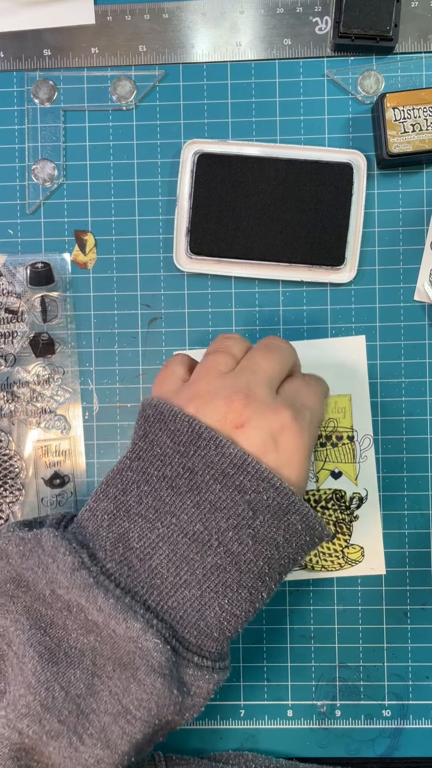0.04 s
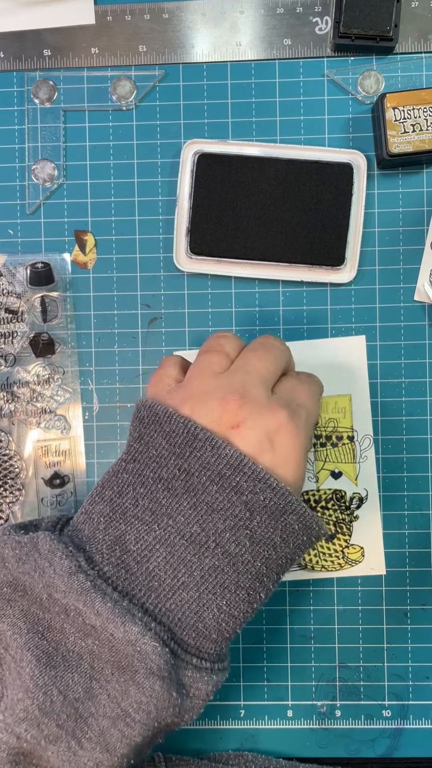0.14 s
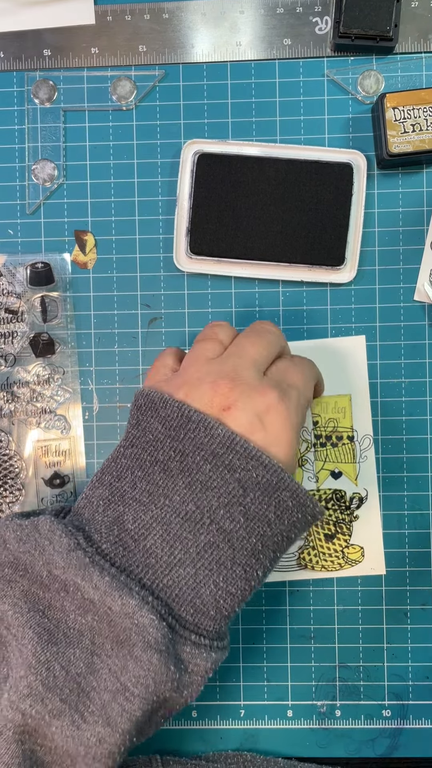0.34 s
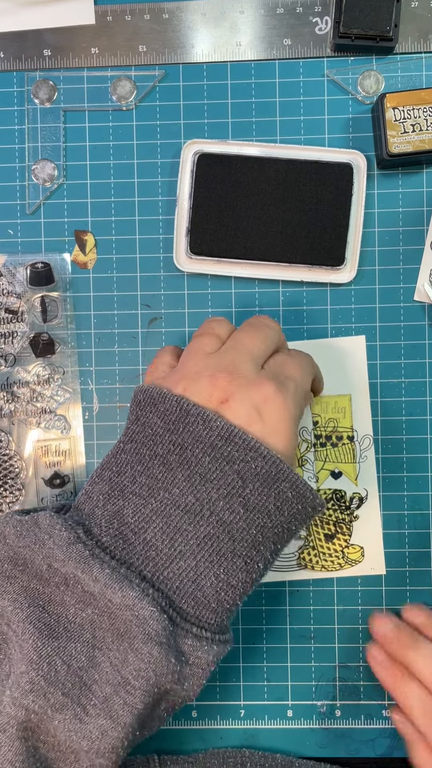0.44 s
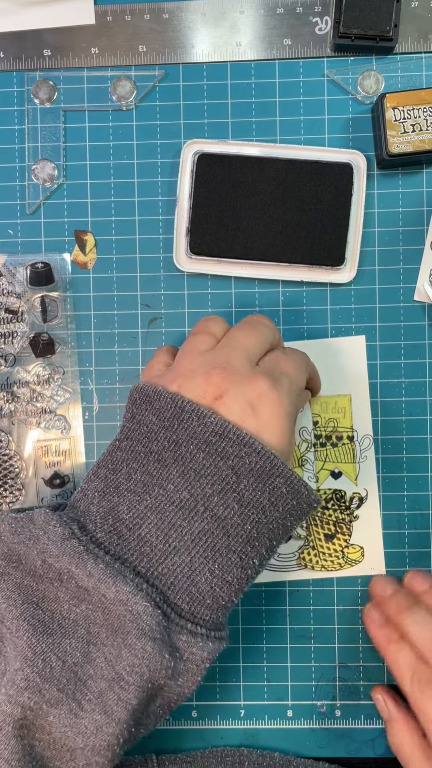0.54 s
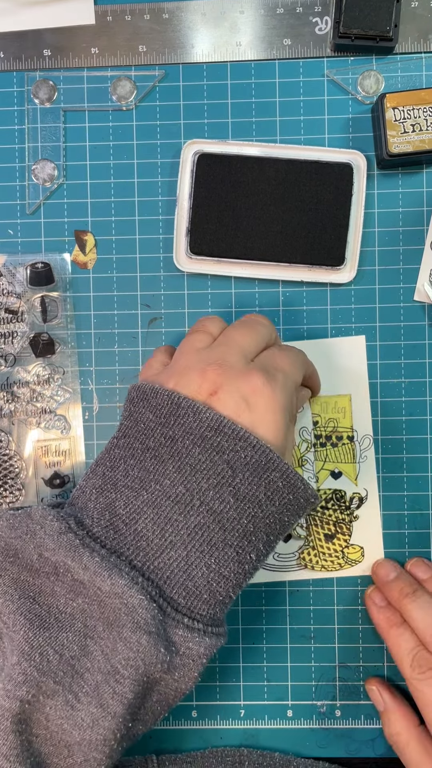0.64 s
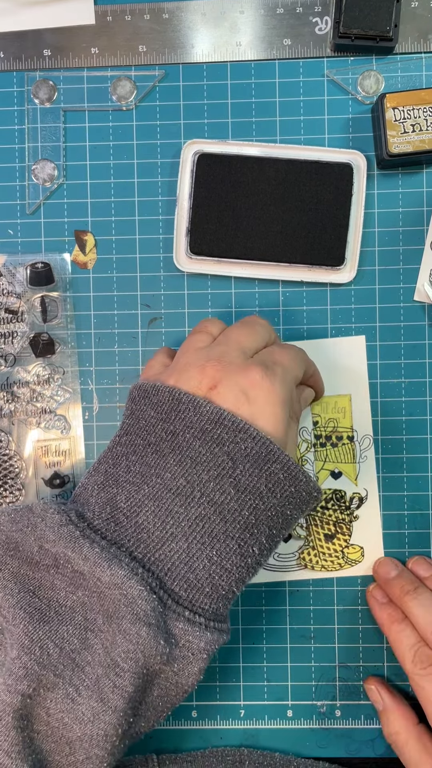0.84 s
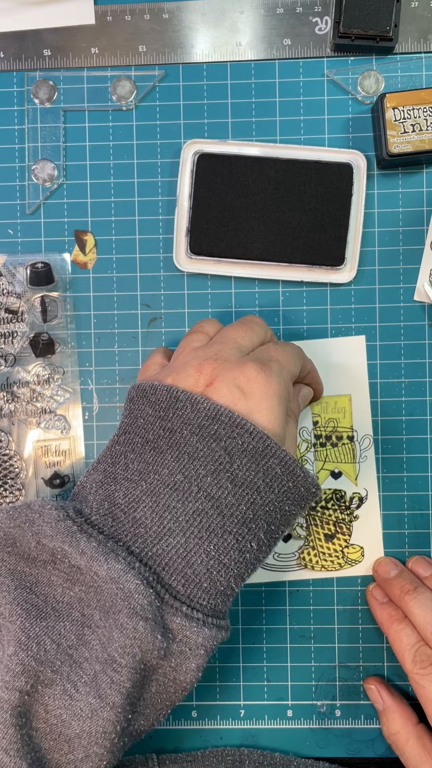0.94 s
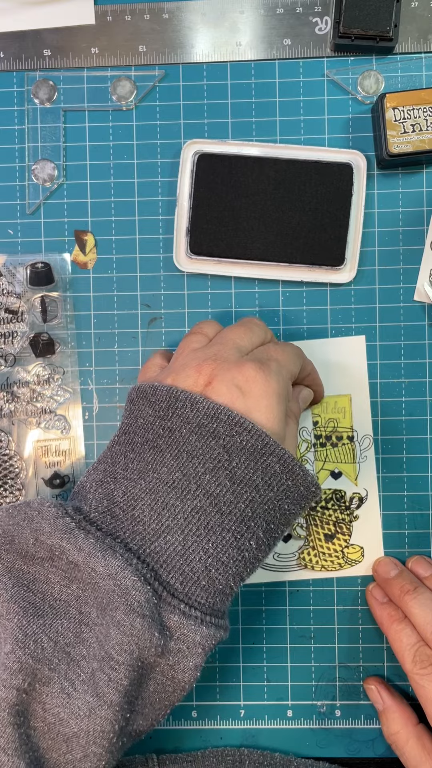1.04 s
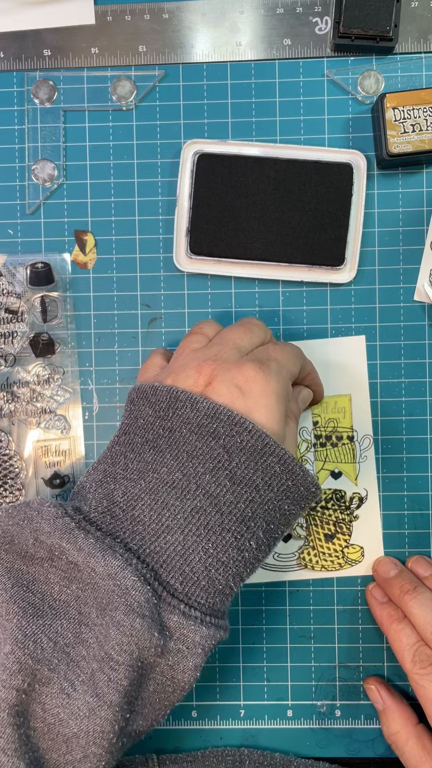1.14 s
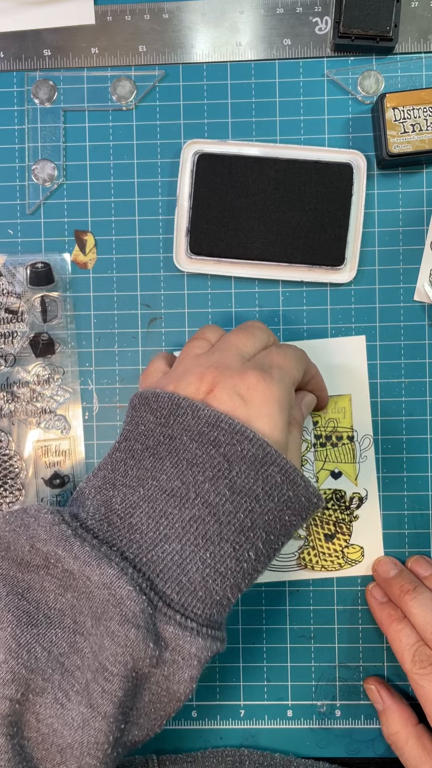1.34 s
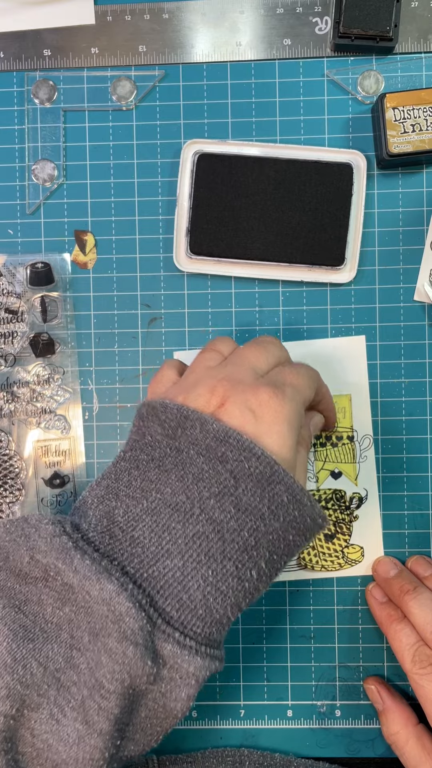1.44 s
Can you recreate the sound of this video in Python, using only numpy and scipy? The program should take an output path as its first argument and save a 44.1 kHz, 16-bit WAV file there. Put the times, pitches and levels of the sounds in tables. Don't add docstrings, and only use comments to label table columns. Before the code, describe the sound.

A hand-held stamp block thumps onto card at 0.14 s, a crisp slap over a short, deep board boom. From about 0.35 to 0.7 s knit sleeve and card rub softly above a faint low sway. Near-quiet follows, with a tiny shift around 1.0 s. Sleeve rustle returns at 1.4 s, then rapid sticky ticks from 1.42 s and a bright snap at 1.46 s. Close, quiet room.

```python
import sys
import numpy as np
from scipy import signal
from scipy.fft import rfft, irfft, next_fast_len
from scipy.io import wavfile
from scipy.ndimage import uniform_filter1d

SR = 44100
rng = np.random.default_rng(int(sys.argv[2]) if len(sys.argv) > 2 else 0)


def bounce(signal):
    frames = np.transpose(np.atleast_2d(signal))
    limited = np.clip(frames, -1, 1)
    pcm = np.round(limited * 32767).astype(np.int16)
    wavfile.write(sys.argv[1], SR, pcm)


def rack_gain(trim_db):
    fader = np.asarray(trim_db, float)
    return 10 ** (fader / 20)


N = 66150
T = np.arange(N) / SR
SIZE = next_fast_len(2 * N)
F = np.arange(SIZE // 2 + 1) * SR / SIZE + 1e-3
THUMP_S = .1422


def curve(table):
    table = np.array(table, float)
    return rack_gain(np.interp(np.log(F), np.log(table[:, 0]), table[:, 1]))


def shape(x, response):
    return irfft(rfft(x, SIZE) * response, SIZE)[..., :N]


def unit(x):
    return x / np.sqrt(np.mean(x ** 2))


def delay(s):
    return np.exp(-2j * np.pi * F * s)


def walk(rate):
    hold = int(SR / rate)
    steps = np.repeat(rng.standard_normal(N // hold + 1), hold)
    return 1.3 * uniform_filter1d(uniform_filter1d(steps, hold), hold)[:N]


def noise(table, unlike_table, flicker_db, rate, grain=1.):
    raw = rng.standard_normal((2, N)) * grain
    out = 0
    for hz in 25 * 2 ** np.arange(0, 9.6, .5):
        band = np.clip(1 - np.abs(2 * np.log2(F / hz)), 0, 1)
        out = out + shape(raw, band) * rack_gain(flicker_db * walk(min(rate, hz / 4)))
    out = shape(out, curve(table) * np.array([np.ones(len(F)), curve(unlike_table)]))
    return out / np.sqrt(np.mean(out[0] ** 2))


def modes(table):
    s = 2j * np.pi * F
    total = 0
    for k, (hz, db, t60) in enumerate(table):
        turn = 2 * np.pi * hz
        total = total + (-1) ** k * rack_gain(db) * turn / ((s + np.log(1000) / t60) ** 2 + turn ** 2)
    return total * SR


def burst(start, rise, t60):
    u = T - start
    return np.clip(u / rise, 0, 1) * rack_gain(-60 * np.clip(u - rise, 0, None) / t60)


# f/Hz, level/dB, t60/s
BOARD_MODES = [(60, -9, .24), (139.7, 6, 0.04), (194.6, 2.5, 0.055), (267, -16.5, .08), (324, -6, 0.041),
               (405, -15.5, 0.08), (511, -17.5, 0.064), (662, -15.5, 0.067), (787, -17.5, 0.061),
               (929, -16.5, .045), (1052, -16, 0.035), (1300, -21, .03), (1968, -23.5, 0.018),
               (93, -13.5, 0.2)]
# f/Hz, level/dB
BOARD_UNLIKE = [(60, -22.5), (200, -25.5), (400, -13.5), (700, -3.5), (1300, -19.5), (3000, -21)]
# t/s, level/dB
NUDGES = [(.085, -59), (.107, -59), (0.118, -54), (.13, -55), (0.408, -65), (0.529, -62.5), (0.641, -62.5),
          (.73, -67), (.84, -71), (.91, -65), (.995, -61), (1.013, -58), (1.47, -64)]


def board():
    lead_s, thump_db, soft_hz = .0016, -14.5, 349
    bend_cycles = .9
    nudges = sum(rack_gain(db) * delay(s) for s, db in NUDGES)
    push = rack_gain(thump_db) * delay(THUMP_S - lead_s) + nudges / (1 + 1j * F / soft_hz) ** 2
    bend = np.exp(-2j * np.pi * bend_cycles * np.log(np.clip(F, 25, None) / 3000))
    bend = bend / (1 + (42 / F) ** 6)
    twist = [(hz * 0.4, db, t60) for hz, db, t60 in BOARD_MODES]
    same = modes(BOARD_MODES)
    unlike = -modes(twist) * curve(BOARD_UNLIKE)
    return np.array([irfft(push * bend * ring, SIZE)[:N] for ring in (same, unlike)])


# t/s, level/dB, t60/s
CRACKS = [
    (0.14, -57, 0.0056),
    (0.1417, -33, 0.0083),
    (0.1437, -40.5, 0.013),
    (.148, -53, 0.034),
]
# f/Hz, level/dB
CRACK_COLOUR = [(300, -25.5), (1000, 4), (1600, -9), (2200, -4), (4000, -4.5), (6500, -11.5),
                (11000, -17.5), (15500, -34)]
# f/Hz, level/dB
ANSWER_COLOUR = [(45, -43.5), (110, 19.5), (400, 4.5), (1000, -9), (2000, -20.5), (4500, -28),
                 (8000, -34.5), (15500, -47.5)]
# f/Hz, level/dB
CONTACT_UNLIKE = [(100, -37), (300, -11.5), (700, 2), (1500, -12), (3000, -2.5), (8000, -23.5),
                  (15000, -21.5)]


def slap():
    answer_db, answer_t60_s, answer_ends_s = -31, 0.21, 0.263
    hits = sum(rack_gain(db) * burst(s, 0.00013, t60) for s, db, t60 in CRACKS)
    crack = hits * noise(CRACK_COLOUR, CONTACT_UNLIKE, 0.81, 100)
    fade = np.clip((answer_ends_s - T) / 0.02 + 1, 0, 1)
    answer = burst(THUMP_S, .006, answer_t60_s) * fade * noise(ANSWER_COLOUR, CONTACT_UNLIKE, 1.4, 60)
    return crack + rack_gain(answer_db) * answer


# t/s, level/dB, extra treble level/dB
TICKS = [(1.4245, -55, -13), (1.428, -56, -3), (1.4296, -46, -2), (1.4344, -44.5, -17.5),
         (1.4392, -49, -25), (1.4441, -42.5, -15), (1.4499, -42.5, -9), (1.4525, -41, -1),
         (1.4568, -42.5, 0), (1.4665, -47, -2), (1.47, -42.5, -4), (1.4715, -56, -3), (1.474, -43, -5),
         (1.4795, -61, -6), (1.483, -46.5, -1), (1.4838, -59, -6), (1.491, -54, -6), (1.494, -54, -1)]
# t/s, level/dB, t60/s
SNAP = [
    (1.4603, -41, 0.015),
    (1.4619, -30, 0.005),
    (1.4627, -33, 0.006),
    (1.4636, -37, 0.007),
]
# f/Hz, level/dB
TICK_COLOUR = [(500, -51), (1200, -9), (2300, -1.5), (3300, -7), (6300, -5), (9500, -5), (12800, -9),
               (15500, -4)]
# f/Hz, level/dB, t60/s
BLOCK_MODES = [(693, -1.5, 0.034), (1000, 1, 0.022), (1310, 5, 0.027), (1530, 6, 0.04), (2132, 0.5, 0.082),
               (2440, -13, 0.066), (3114, -7.5, 0.069), (3710, -17, 0.092), (4180, -9, 0.16),
               (5640, -19, 0.04)]


def peel():
    rise_s, tick_t60_s, treble_hz, block_db = .0002, .009, 8000, -10.5
    raw = rng.standard_normal((2, N))
    high = 1 / (1 + (treble_hz / F) ** 6)
    snap = sum(rack_gain(db) * burst(s, rise_s, t60) for s, db, t60 in SNAP) * raw
    dull = sum(rack_gain(db) * burst(s, rise_s, tick_t60_s) for s, db, _ in TICKS) * raw
    bright = sum(rack_gain(db + up_db) * burst(s, rise_s, tick_t60_s) for s, db, up_db in TICKS) * raw
    ports = np.array([np.ones(len(F)), curve(CONTACT_UNLIKE)])
    colour = 2 * curve(TICK_COLOUR) * ports
    jolt = sum(rack_gain(db) * delay(s) for s, db, _ in SNAP[:2])
    ring = irfft(jolt * modes(BLOCK_MODES) * 2 * ports, SIZE)[:, :N]
    ring = rack_gain(block_db) * ring * np.sqrt(np.mean(snap ** 2) / np.mean(ring ** 2))
    return shape(dull + snap, colour * (1 - high)) + shape(bright + snap, colour * high) + ring


# t/s, card rub level/dB, knit hiss level/dB
SLIDE_IN = [
    (0, -93, -100),
    (.04, -83, -93),
    (0.084, -98, -85),
    (.1, -84.5, -97),
    (0.114, -75, -79.5),
    (.138, -64, -87),
    (.2, -105, -86),
    (.25, -100, -89.5),
    (.27, -100, -105),
]
BRUSH = [
    (.33, -93, -100),
    (0.421, -78, -86.5),
    (.5, -82.5, -83.5),
    (0.523, -76.5, -68.5),
    (.565, -78, -75.5),
    (.582, -77.5, -66.5),
    (.622, -79, -70.5),
    (.648, -78.5, -85.5),
    (0.677, -84.5, -74.5),
    (.73, -87.5, -100),
]
SETTLE = [
    (.9, -93.5, -105),
    (1.02, -90, -105),
    (1.1, -100, -105),
]
PEEL_RUB = [
    (1.291, -100, -105),
    (1.332, -103, -85.5),
    (1.371, -107, -90),
    (1.409, -81, -74.5),
    (1.43, -81, -68),
    (1.466, -57, -78),
    (1.5, -63.5, -70),
]
# f/Hz, level/dB
CARD_COLOUR = [(150, -23), (300, -3), (700, 4.5), (1200, 0.5), (2300, 2.5), (3400, -7), (5000, -0.5),
               (9000, -14.5)]
# f/Hz, level/dB
KNIT_COLOUR = [(3000, -23.5), (5000, -4), (7000, 3.5), (9000, 2), (10300, 4), (12000, -1.5), (13500, -6),
               (15500, -9)]
# t/s, spread/s, f/Hz, width/Hz, level/dB
SCUFFS = [(0.061, 0.017, 1875, 81, -84.5), (.055, 0.016, 11350, 690, -95.5), (.115, 0.036, 4470, 1000, -83),
          (0.129, 0.016, 760, 850, -62.5), (.22, 0.033, 15260, 506, -92.5), (.4, .09, 15550, 300, -95.5),
          (1.1, .09, 15450, 300, -100), (.43, 0.03, 2010, 509, -91), (.44, 0.059, 5100, 496, -102.5),
          (.52, 0.03, 2780, 400, -90), (.595, 0.018, 1990, 406, -87.5), (0.671, 0.028, 685, 250, -82),
          (.68, 0.022, 15000, 600, -86), (.7, 0.07, 1604, 250, -90), (.78, 0.045, 720, 251, -90),
          (.89, .02, 665, 200, -84), (1.021, 0.027, 620, 303, -81.5), (1.36, 0.034, 15700, 500, -92),
          (1.371, .03, 12450, 1198, -92.5)]


def fibres():
    per_s, catch_db = 500, 4
    caught = rng.random(N) < per_s / SR
    return 1 + caught * rack_gain(catch_db * np.clip(rng.exponential(size=N), 0, 3.5))


def rustle():
    flicker_db = 1.5
    s, card_db, knit_db = np.array(SLIDE_IN + BRUSH + SETTLE + PEEL_RUB).T
    card = noise(CARD_COLOUR, CONTACT_UNLIKE, flicker_db, 24, fibres())
    knit = noise(KNIT_COLOUR, CONTACT_UNLIKE, flicker_db, 55, fibres())
    squeak = 0
    for at, spread, hz, wide, db in SCUFFS:
        narrow = unit(shape(card + knit, 1 / (1 + (2 * (F - hz) / wide) ** 2)))
        squeak = squeak + rack_gain(db) * narrow * np.exp(-.5 * ((T - at) / spread) ** 2)
    return rack_gain(np.interp(T, s, card_db)) * card + rack_gain(np.interp(T, s, knit_db)) * knit + squeak


# t/s, f/Hz, level/dB
SWAY = [(0.271, 62.03, -74), (0.305, 60, -51.5), (0.342, 62.56, -76), (0.461, 62.7, -62),
        (.5, 59.95, -71.5), (.538, 57, -54.5), (0.574, 55.2, -67), (0.615, 52.4, -54), (.66, 54.56, -70),
        (.705, 57.37, -57.5), (0.769, 60, -71), (.84, 60, -71), (0.869, 60, -77), (.955, 58.6, -72.5),
        (0.983, 58.9, -75), (1.019, 57.7, -56.5), (1.33, 61.9, -59), (1.5, 62.6, -53.5)]


def sway():
    wobble_db, wobble_hz = 2., 1.5
    s, hz, db = np.array(SWAY).T
    db = np.interp(T, s, db) + wobble_db * walk(45)
    hz = np.interp(T, s, hz) + wobble_hz * walk(25)
    fade_in = np.clip((T - .27) / .03, 0, 1)
    tone = np.sqrt(2) * rack_gain(db) * np.sin(2 * np.pi * np.cumsum(hz) / SR) * fade_in
    return np.array([tone, 0.032 * tone])


# f/Hz, level/dB
ROOM_COLOUR = [(15, -36), (25, -16.5), (76, 6), (153, -8.5), (200, -7.5), (384, -20), (962, -27),
               (9000, -41.5), (15600, -45)]
# f/Hz, level/dB
ROOM_UNLIKE = [(60, -24.5), (200, -7), (500, 6), (1500, 2), (3000, 0), (8000, -8.5), (15000, -10)]


def room():
    return rack_gain(-70.5) * noise(ROOM_COLOUR, ROOM_UNLIKE, 1., 6.9)


# f/Hz, phase/rad
PORT_PHASE = [(0, 0), (5000, .3), (7700, 3.1), (10300, 5.9), (12000, 6.9), (14400, 9.4), (16400, 11.8)]
# f/Hz, level/dB
PORT_BALANCE = [(60, 0), (200, -1.5), (600, -0.5), (2000, 0), (6000, -0.15)]


def scene():
    same, unlike = room() + board() + slap() + sway() + rustle() + peel()
    phase = np.interp(F, *np.array(PORT_PHASE).T)
    lead = np.exp(.5j * phase) * np.sqrt(curve(PORT_BALANCE))
    return np.array([shape(same - unlike, lead), shape(same + unlike, 1 / lead)])


def low_pass(x):
    return signal.sosfilt(signal.butter(12, 16760, fs=SR, output="sos"), x)


def record(dry):
    top_hz = 15800
    cut = signal.sosfilt(signal.ellip(6, .2, 24, top_hz, fs=SR, output="sos"), dry)
    cut = shape(cut, 1 / (1 + (F / 16750) ** 200))
    return low_pass(cut)


dry = scene()
out = record(dry)
bounce(out)
```